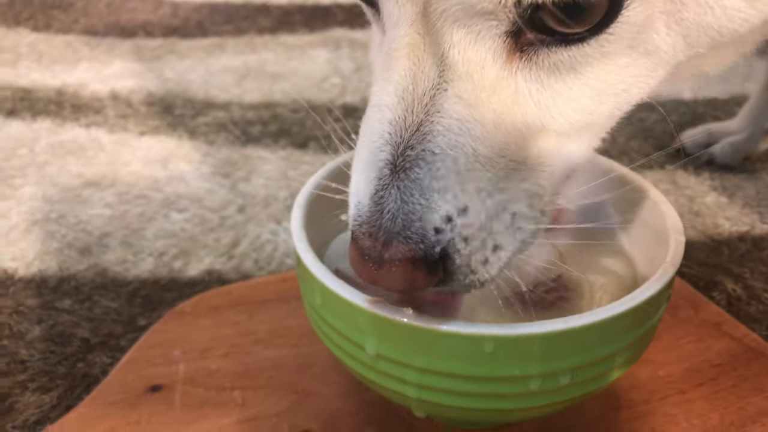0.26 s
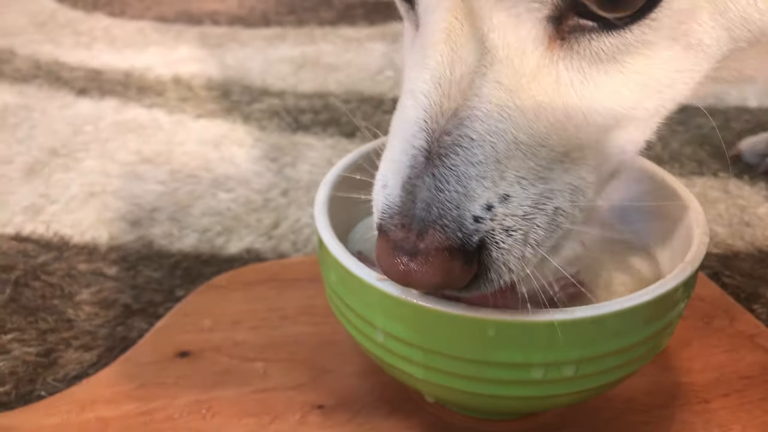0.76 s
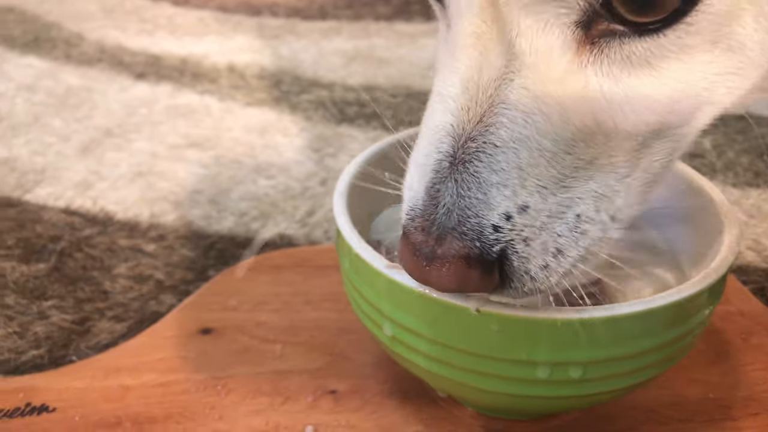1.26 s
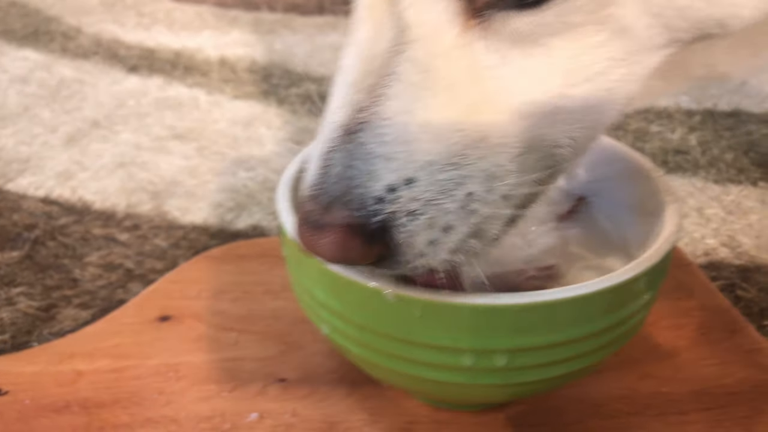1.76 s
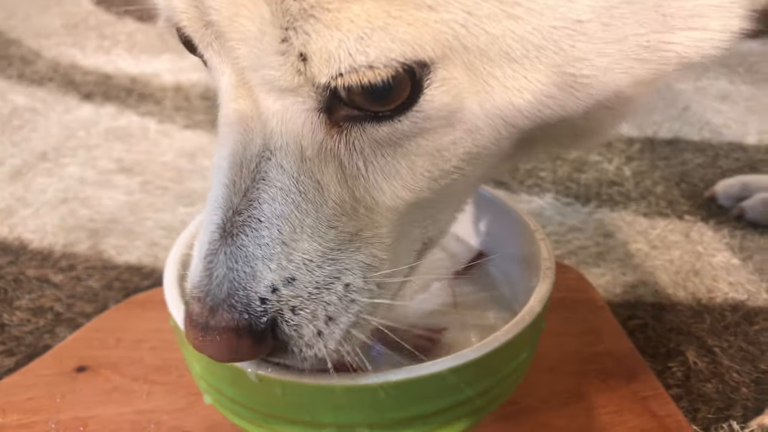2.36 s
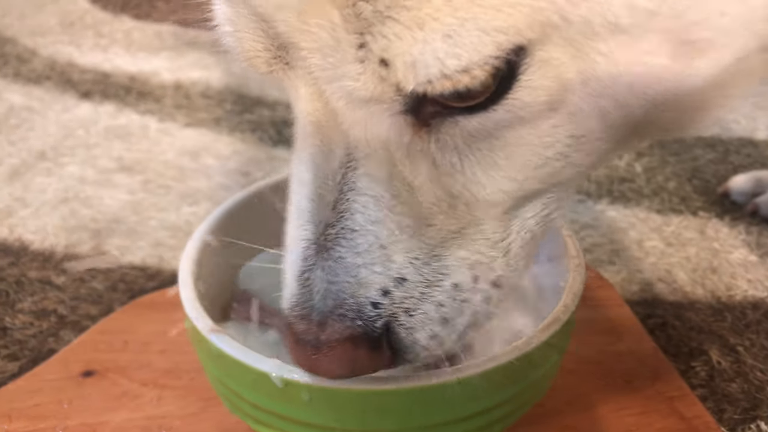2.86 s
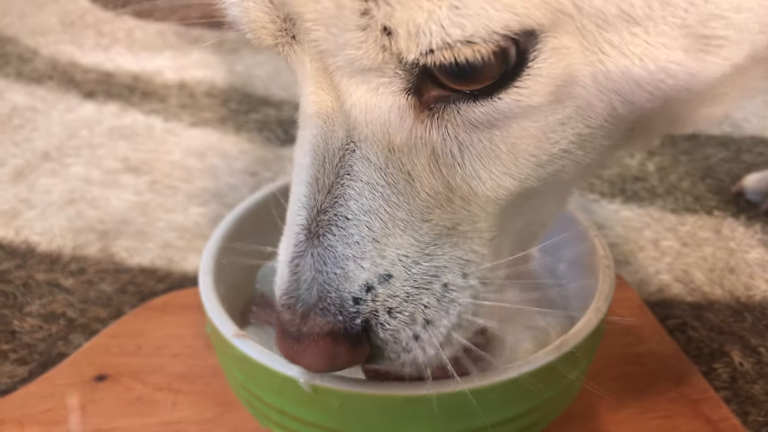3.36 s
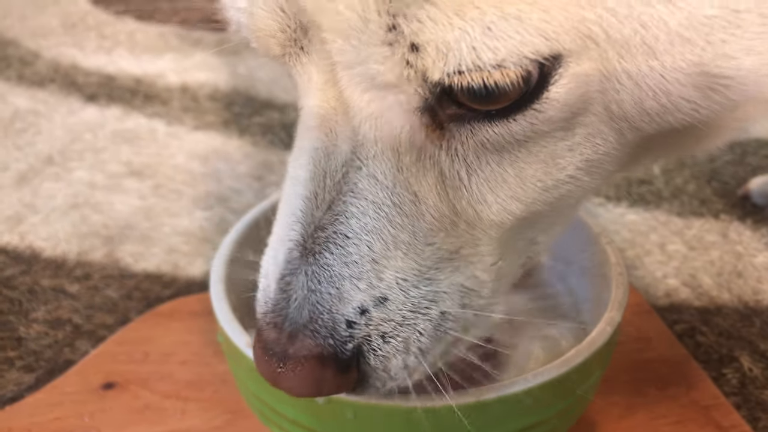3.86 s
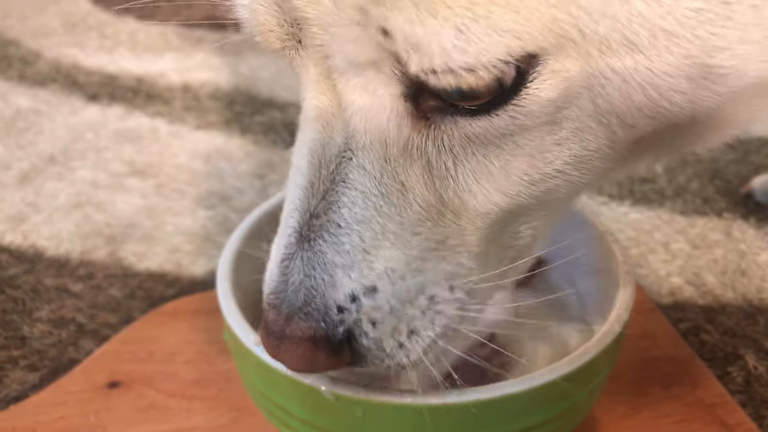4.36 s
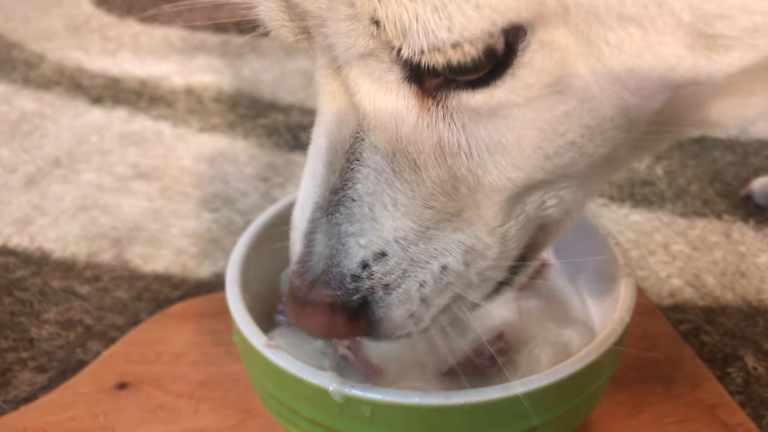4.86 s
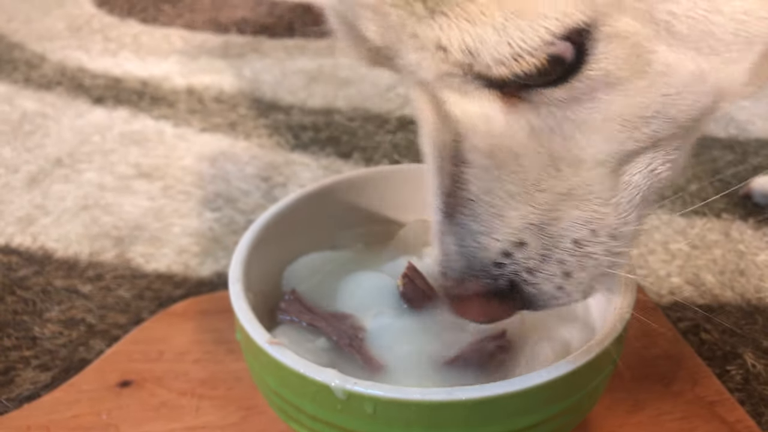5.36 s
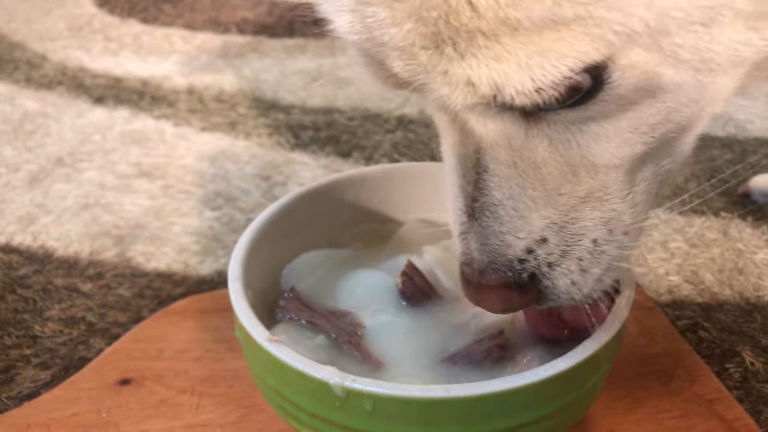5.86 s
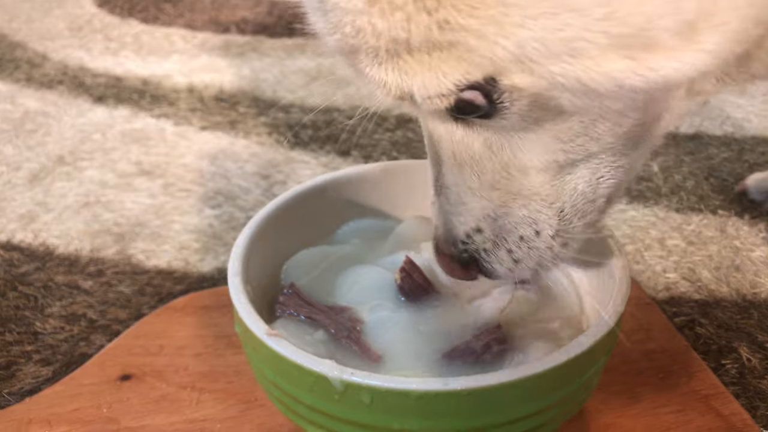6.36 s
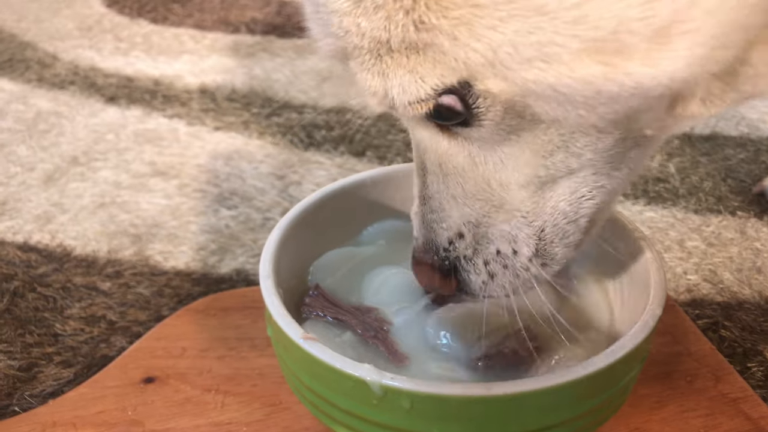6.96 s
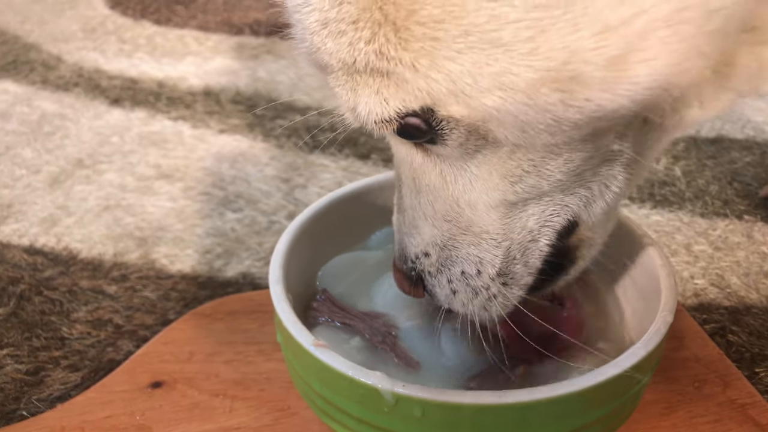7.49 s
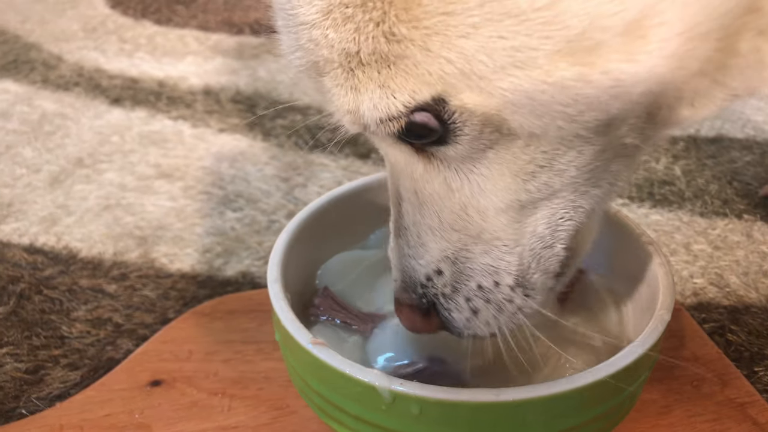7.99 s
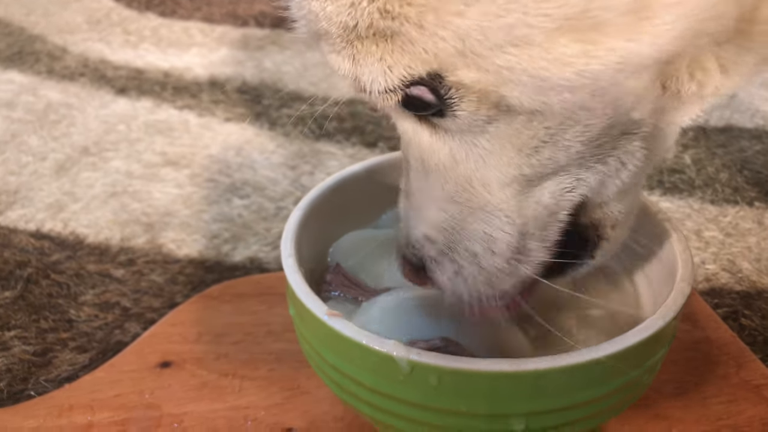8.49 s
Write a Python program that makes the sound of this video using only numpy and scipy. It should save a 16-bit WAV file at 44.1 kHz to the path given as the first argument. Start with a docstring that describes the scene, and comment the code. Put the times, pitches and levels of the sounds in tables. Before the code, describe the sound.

Steady lapping by a dog, close stereo microphone, dry furnished room with barely any echo. Each stroke goes soft lick, rounded plop, brief splatter, then a quieter wet swallow before the next. Sharper lip smacks stand out early on and again near the end. A tooth lightly rings the bowl around the middle and later, the bowl thuds softly on its board, and one tiny airy slurp slides downward late.

```python
"""A dog laps broth from a glazed bowl about three times a second, close by in a quiet carpeted room.
Each stroke is a low plop, a damped sine for the air pocket scooped under by the tongue, then a splash built
from random bubble grains. Wet smacks and thin saliva ticks are bubble tones with puffs of shaped noise. Now
and then a tooth rings the bowl's modes or the bowl bumps its board; once, a falling whistle of carried noise
is slurped. Sparse echoes and a soft noise floor give the room; two ports hear it all as left and right."""
import sys
import numpy as np
from scipy import signal
from scipy.fft import rfft, irfft, next_fast_len
from scipy.io import wavfile
from scipy.ndimage import uniform_filter1d

SR = 44100
rng = np.random.default_rng(int(sys.argv[2]) if len(sys.argv) > 2 else 0)


def generate_wav(signal):
    """Clip the signal to [-1, 1] and save it as 16-bit WAV at the path in sys.argv[1]."""
    frames = np.transpose(np.atleast_2d(signal))
    scaled = np.clip(frames, -1, 1) * 32767
    pcm = np.round(scaled).astype(np.int16)
    wavfile.write(sys.argv[1], SR, pcm)


N = 384978  # length in samples

# Tongue strokes: plunge_s, pocket_level_db, pocket_pitch_hz, pocket_fall_ms, bowl_swing_level_db,
# splash_delay_ms, then changes to the churning: lick_db, slosh_db, splash_db, swallow_db
STROKES = [(0.2259,-32,596,2,-35.5,-3,4.5,0,3,2.5),(.552,-24,573,2.7,-31,-10,-1.5,3,1,2),(0.8956,-44,510,1.2,-26.5,-13,3,0,-2,0.5),
           (1.2987,-20,560,1.15,-26.5,-7,2.5,3.5,-5.5,-5),(1.596,-38,716,3.3,-26,-11,2,1,-2,-0.5),(1.9125,-29,590,2.7,-28.5,-12,-0.5,3.5,3,3),
           (2.2409,-37,580,2.3,-29.5,-2,1.5,-1.5,-1,4),(2.5697,-29.5,570,3.1,-33.5,-6,0.5,0.5,1.5,2.5),(2.9142,-25,590,2.8,-31,-8,-1.5,3,5,2),
           (3.238,-27.5,540,3.2,-32.5,-7,2.5,-1,0,-4.5),(3.6531,-23.5,557,2.3,-26,-1.5,2,2,2,-3.5),(3.9892,-38.5,700,2.1,-26.5,3,1,1.5,2.5,-2),
           (4.3265,-25.5,512,1.7,-36,-7,3,2.5,0.5,4),(4.6565,-31,552,3.5,-34,-7,-1.5,-2,3.2,5),(4.9768,-26.5,566,2.5,-31,5,-2,-2,-0.5,-2),
           (5.3569,-21,580,2.3,-27.5,-4,2.5,-0.5,1.5,-1.5),(5.702,-22.5,640,1.9,-33,-1,1.5,-2.5,-2.5,-0.5),(6.06,-19.5,670,1.6,-33.5,-2,4,-1.5,-3,.1),
           (6.395,-19.5,673,1.7,-37.5,-5,5.5,-0.5,-1.5,4),(6.708,-19.5,597,1.6,-38.5,.1,1.5,-0.5,0.5,-2),(7.0183,-20,604,1.92,-37,7,-0.5,-0.5,-4.5,2.5),
           (7.4009,-26,587,2,-41.5,-5,-2.5,.1,-0.3,-2.5),(7.7022,-25.5,600,2,-35,-9,2.5,-1,-1,-6.5),(7.995,-22.5,600,2.1,-31,-3,-0.5,-3.5,-2,-0.5),
           (8.3018,-22,614,2.4,-33.5,16,-6,-1.5,-3.5,-1),(8.6321,-26,584,2.4,-33.5,-3,4,-2,-2,-5)]
SURFACE_DB = -51  # tick of the breaking surface
# Larger bubbles bursting: peak_s, tone_level_db, pitch_hz, fall_ms
BUBBLES = [(0.263,-31,910,1),(.3257,-32,1090,1.1),(.572,-26.5,1000,.6),(.576,-30,1000,1.6),(0.5874,-35,1070,1),
           (.6626,-29,810,1.6),(.9109,-29.5,1010,1.4),(1.0556,-32,1180,0.32),(1.3262,-28,820,0.61),(1.6202,-32,984,5.4),
           (1.7118,-34,930,0.7),(1.8225,-32.5,960,1.7),(1.9381,-31,1110,3.1),(1.9499,-36,930,2.3),(1.9967,-39.5,1400,3.7),(2.0144,-36,990,.8),(2.271,-27,1050,0.44),
           (2.2764,-35,1506,4.6),(2.311,-36,1180,1.1),(2.6068,-27,1210,.6),(2.6831,-28,980,1.05),(2.88,-31.5,830,4.9),(2.9435,-32,824,4.5),
           (3.1624,-29,1124,3.2),(3.4007,-33.5,1460,1.5),(3.4244,-26.5,1170,2.7),(3.4341,-33,1110,1.6),(3.5967,-39.5,930,1.3),
           (3.6772,-29,724,1.3),(3.681,-31.5,1500,2.7),(3.706,-29,1340,0.54),(4.018,-25,920,1.4),(4.2328,-23.5,854,3.2),
           (4.4203,-33,1000,1.3),(4.428,-29.5,855,0.6),(4.6747,-34,1020,0.73),(4.7781,-33.5,980,1.1),(5.1557,-30.5,664,1.8),
           (5.603,-43,880,2),(5.8175,-43,750,2.3),(6.0957,-28.5,1060,1.2),(6.1,-24,1230,0.45),(6.426,-33.5,1230,2.5),(6.4316,-24,970,0.64),(6.7394,-32,1310,0.68),
           (6.745,-29,930,1.4),(7.0409,-35,1240,1.2),(7.063,-37,1240,3),(7.19,-38,1380,2.2),(7.4295,-31,1190,1.9),
           (7.466,-36,1000,1),(7.511,-35.5,1130,2),(7.6706,-36.5,880,2.9),(7.7332,-30.5,1300,0.66),(8.0424,-35,760,0.7),(8.4476,-26,806,0.58),
           (8.669,-36,1300,2.6),(8.681,-35,1300,.9)]
# Wet smacks of the mouth: peak_s, tone_level_db, mouth_pitch_hz, fall_ms, spray_re_tone_db
SMACKS = [(.007,-35.5,2780,3,-1.5),(.0679,-40,2740,1.9,-2.5),(0.253,-38,3120,1.8,-2),(.264,-42,2310,1.8,5),(.2732,-31.5,2160,0.77,-3),(0.3252,-37.5,2160,1.9,5),
          (0.589,-29,2220,1.6,-2.5),(0.5962,-28.5,2230,1.2,-8),(0.659,-18,2840,2.5,-6),(0.918,-29.5,3010,2,-13),
          (0.941,-36,2130,1,4),(1.0027,-36,2810,.7,-16),(1.0472,-24.5,3100,2.6,-6),(1.0549,-13.5,2860,2.1,-9),
          (1.3257,-44,2230,0.93,8.5),(1.3512,-37,3040,2.4,-18),(1.625,-32.5,3040,2.1,2),(1.8115,-39.5,3250,0.97,-19),(1.939,-32,1850,0.65,-1.5),
          (2.0891,-36.5,3200,0.71,-0.5),(2.098,-36.5,3040,1.1,-6),(2.208,-49,2790,1.4,-2),(2.2175,-50,2500,1.2,0),(2.2695,-39,2160,3.2,7.5),(2.28,-44,2400,1.4,8),
          (2.3376,-43,2900,2.7,6.5),(2.3758,-28,2100,0.51,0.5),(2.403,-40,2820,3,-10),(2.409,-36,2780,1.3,-10),(2.4128,-30,2900,.6,-8),(2.4214,-28,3000,1.6,-10),
          (2.43,-43,2900,2,-8),(2.6068,-28.5,2380,0.87,-6),(2.683,-34.5,2700,1.3,-3),(2.9461,-24.5,2070,2.1,-1),(2.9528,-25,4400,0.83,-1.5),
          (2.9755,-32,2860,0.8,-4),(3.023,-17.5,2690,0.96,-6.5),(3.171,-41,2440,.7,-2),(3.186,-41,3900,3.9,-0.5),(3.401,-29.5,4530,4.1,0),(3.396,-44,4000,1.1,-2),(3.422,-21.5,3030,1.7,-1.5),
          (3.4642,-35.5,2110,1.3,-7),(3.6804,-29.5,4270,1.3,-2.5),(3.6905,-26.5,4500,.9,-16),(3.7068,-37.5,2840,2.1,1.5),
          (4.0177,-28,4230,0.34,2.5),(4.028,-31,4330,1.7,4.5),(4.045,-34,1570,3.1,-15),(4.218,-47,3010,2.1,-9),(4.2318,-29,3770,1.8,0.5),
          (4.3611,-36,4100,5.2,2.5),(4.4193,-33.5,2060,2.8,-4),(4.696,-27,2310,1.4,-3.5),(4.9425,-37,4350,0.4,-9),
          (4.9907,-32,4460,0.44,-2.5),(5.019,-31,2090,2.8,-2),(5.0252,-32.5,3800,1.5,-12),(5.141,-30,2000,0.65,-6),(5.1453,-20,2160,2.8,-5),
          (5.15,-22.5,1930,2,-6.5),(5.1578,-28.5,2790,4.5,-6),(5.1802,-42,2900,4.6,4),(5.376,-36,2780,2.8,-7),
          (5.3945,-28,2530,1.1,-5),(5.5976,-42,2830,0.95,-2),(5.7414,-36.5,1980,0.75,7),(5.7518,-34,1910,.9,-15),(5.92,-38.5,2930,0.56,-8),
          (5.96,-42.5,2400,.9,-1),(6.095,-28,2140,1.1,-0.5),(6.1,-26,4130,1.1,-4),(6.253,-44.5,2800,5.6,-9),(6.2722,-44,2760,.7,-12),(6.294,-44.5,2660,.8,3),(6.4275,-25.5,1820,.8,-16),(6.432,-34.5,2240,0.7,3.5),
          (6.4423,-39,2140,.5,-7),(6.538,-31,2030,0.14,2),(6.7461,-32.5,2000,0.5,-13),(6.7514,-36,2180,1.6,-7),
          (7.0643,-38,2220,1,-15),(7.077,-45,2930,1.5,3),(7.106,-43,3350,1,-1),(7.191,-47.5,2950,5.1,5),(7.432,-34.5,2220,.8,3),(7.5065,-39,3900,3.1,-11),(7.5757,-48,3100,0.68,-4),(7.7315,-33.5,4100,.5,-10),
          (8.0192,-35.5,1920,1.7,-21),(8.034,-36.5,4800,0.47,0.5),(8.127,-41.5,2000,0.93,-4),(8.179,-50,3000,0.73,-2),(8.2705,-47,2530,.7,-7),(8.337,-41,1910,.8,-4),(8.349,-37,4040,4.3,2.5),
          (8.4305,-38,2740,2,-10),(8.44,-20,2900,1.3,-7),(8.4445,-26,2800,3.4,.5),(8.679,-44,3210,1.6,-12)]
SMACK_RISE_S = 0.00077
# Saliva ticks: peak_s, tone_level_db, pitch_hz, mist_re_tone_db
TICKS = [(.0344,-37.5,8480,2),(.0652,-31.5,6260,-32),(.1492,-40.5,5700,-18),(0.1668,-43,7900,4),(.2682,-30.5,5000,-9),(.3262,-39,7000,0),
         (.353,-25,5950,-4.5),(.502,-34,5280,-24),(0.5865,-31,5000,-10),(.5936,-32,4970,-8),(0.6585,-34.5,4600,10),
         (.8303,-43,6900,0),(0.9058,-35.5,5000,-7),(1.053,-29,5800,-36),(1.2282,-41,7750,6.5),(1.531,-37.5,5860,-2.5),(1.56,-37,4960,-4),
         (1.6241,-25,4860,-18),(1.8663,-46,7900,7),(1.954,-28,4760,-31),(2.0064,-33.5,5340,-2),(2.047,-28,5870,0.5),
         (2.3737,-33,5420,0),(2.6126,-37,4880,-30),(2.961,-38,4610,-29),(3.024,-37,4500,-11),(3.1881,-39.5,7400,-1),
         (3.294,-34.5,4740,-17),(3.4015,-29,4600,1.5),(4.021,-19,4680,-18),(4.2313,-40,4500,4),(4.356,-35,4570,1),
         (4.365,-32,4500,-31),(4.371,-33,6400,-29),(4.42,-35,4570,-1),(4.6965,-32,4440,-23),(4.994,-31,4700,-11),
         (5.1426,-36,4600,3),(5.154,-30,8930,2.5),(5.2494,-44,6500,-4),(5.2764,-32.5,6600,-20),(5.328,-39.5,5930,-16),(5.4,-33.5,6460,1),
         (5.593,-35,6280,-4),(5.6683,-43.5,6660,-6),(5.7898,-40,7600,-13),(5.799,-38,6430,-1),(5.845,-40,6930,0),(6.0954,-27,4700,-33),(6.108,-37,6700,-7),(6.426,-32,4700,-29),
         (6.434,-30,4970,-22),(6.441,-34,6450,-35),(6.5372,-31.5,6670,-5),(6.719,-35,5250,-29),(6.7454,-30.5,4780,-32),
         (6.847,-33.5,6700,-1),(7.1585,-36,8230,10.5),(7.1909,-37.5,4830,1.5),(6.985,-45,6370,3),(7.2315,-42,6950,0),(7.43,-23.5,4900,-16),(7.4356,-31,6750,-24),
         (7.476,-47,6500,-8),(7.5086,-21.5,6400,-34),(7.5128,-23,5800,-16),(7.6435,-38,6150,-11),(7.7345,-31.5,4880,-24),(7.917,-42,7950,-21),(8.0313,-27,5740,-29),
         (8.4406,-24.5,7500,-10),(8.4474,-24,6640,-8),(8.5347,-36.5,7260,-7),(8.67,-35,5030,-16),(8.68,-34,6400,-25)]
# Chance pops of each stroke: from_s, to_s (both after the plunge), mean bubble_db, smack_db, tick_db
DROPLETS = [(-.1, -0.066, -54.5, -55.5, -52), (-.07, -.035, -56, -55.5, -48.5),
            (.012, 0.036, -40, -44, -41.5), (.02, 0.051, -43.5, -44, -41), (.03, .06, -41.5, -45, -45.5),
            (.09, .15, -49, -50.5, -47.5)]
DROPLET_SPREAD_DB = 10.5  # full range of the chance levels

# Relative bubble spectra, coarse to fine; each: pitch_hz, level_db
SLOSH_SPECTRUM = [(150, 3), (300, 7), (600, 5), (1200, 5), (1700, -23)]
SPLASH_SPECTRUM = [(1300, 12.5), (2100, 11.5), (2900, 9.5), (3600, 9), (4700, 11), (5500, -39)]
FIZZ_SPECTRUM = [(4000, -10), (5000, 0.5), (6500, 5), (8000, -0.5), (9500, -16)]
MIST_SPECTRUM = [(5000, -41), (7500, -3), (9500, -6), (12500, -1.5), (15500, -3.5)]
# Relative noise spectrum of the spray around a smack: frequency_hz, level_db
SPRAY_SPECTRUM = [(400, -30), (900, -12), (1600, -14), (2100, 0), (2900, 0), (3500, -9), (4600, -6),
                  (6000, -17), (9000, -32), (15500, -36)]
# Churning over one stroke (lick, hush, plunge, splash, swallow, hush), before the stroke's own changes:
# after_plunge_s, slosh_level_db, splash_level_db, fizz_level_db, mist_level_db
STROKE_SHAPE = [(-.125, -72.5, -68, -74, -77.5), (-.1, -67, -67, -64, -63), (-.04, -69, -68.5, -70, -64.5),
                (-.02, -72.5, -71.5, -75, -77), (.01, -55.5, -57.5, -67, -60),
                (.045, -49, -47.5, -55.5, -89), (.075, -55.5, -59, -65, -67), (.13, -60.5, -61, -66, -63.5),
                (.17, -67, -72, -75, -69)]
UNHEARD_PLUNGE_S = -0.063  # a plunge just before the start, whose churn still dies away
SPLASH_FROM_S, SWALLOW_FROM_S = 0.025, 0.1  # after the plunge
BURSTS_PER_S, BURST_FALL_S = 45, 0.005  # droplets land in sudden clusters that thin out

# A tooth touches the bowl; the spot decides which modes ring: start_s, lowest_mode_db, upper_modes_db
KNOCKS = [(0.349, -63, -40), (0.5, -81, -58), (1.223, -78, -53), (2.047, -68, -45), (2.374, -50.5, -47),
          (2.873, -76, -52.5), (4.371, -49, -66), (6.536, -40.5, -57)]
# Modes of the glazed wall: pitch_hz, level_re_knock_db, t60_s
BOWL_MODES = [(1291, 0, .5), (3370, -4, .14), (6067, 0, .11)]
# The bowl bumps its board: bump_s, level_db
THUDS = [(0.954, -53), (1.186, -46), (1.591, -54), (1.817, -62), (2.559, -55), (2.897, -53.5), (3.225, -59),
         (3.505, -45), (3.7, -55), (4.314, -64), (4.64, -54), (4.979, -60), (7.232, -62)]
THUD_DELAY_S = 0.0064  # from the bump to the start of the ringing
# Modes of the board: pitch_hz, level_re_thud_db, t60_s
BOARD_MODES = [(129, 8, 0.045), (330, 12.5, 0.013)]
# One slurp of air drawn past the lips: time_s, pitch_hz, level_db
SLURP_GLIDE = [(7.188, 1810, -66), (7.205, 1736, -54), (7.251, 1546, -68), (7.31, 1410, -69)]

# Phase by which the left port leads (negative: lags): frequency_hz, lead_rad
PORT_LEAD = [(100, 0.21), (2000, -0.31), (5400, -0.73), (8700, -1.02), (11000, -1.8), (13500, -1.53),
             (15500, -0.83)]
# Reverberation time: frequency_hz, t60_s
ROOM_T60 = [(200, 0.49), (600, 0.23), (2000, 0.27), (5000, 0.14), (12000, 0.047)]
# Echo strength, dulled by soft furnishings, for a tap of unit height: frequency_hz, tap_level_db
WALL_ECHO = [(200, -37), (350, -40), (600, -37), (1500, -35), (3000, -43), (7000, -46), (15000, -48)]
# Relative spectrum of the room tone: frequency_hz, level_db_per_hz
AIR_SPECTRUM = [(15, -32), (30, -10), (80, 0), (170, -6.5), (300, -0.5), (450, -15.5), (900, -13.5),
                (1700, -26), (2500, -22), (6700, -28.5), (10000, -36.5), (16000, -23)]
AIR_DB = -61.5  # RMS level of the whole room tone
# Depth of the drifting patches in the room tone: frequency_hz, depth_db
PATCH_DEPTH = [(60, 2.5), (200, 1.5), (600, -9.5), (15000, -9)]
# Likeness of the room tone at the two ports: frequency_hz, correlation
PORT_LIKENESS = [(60, 0.94), (130, 0.51), (300, 0.23), (700, 0.19), (3000, 0.18), (7000, 0.14),
                 (15000, 0.058)]
EDGE_HZ = 15900  # upper band limit


def plops():
    """Cavity resonance: the scooped pocket and the bowl's slosh swing together as the surface ticks."""
    out = np.zeros((2, N))
    for s, pocket_db, hz, fall_ms, swing_db, *_ in STROKES:
        t, pocket_shape = hump(0.0011, fall_ms / 1000)
        pocket = pocket_shape * np.sin(2 * np.pi * hz * t)
        swing = hump(0.0015, 0.003)[1] * np.sin(2 * np.pi * 340 * t)
        add(out, s + t[0], gain_of(pocket_db) * pocket + gain_of(swing_db) * swing)
        surface = pop(1870, 0.00022, 0.00094, 0, 1.7, SPRAY_SPECTRUM)
        add(out, s + t[0] - 1 / hz, gain_of(SURFACE_DB) * surface)  # one pocket period earlier
    return out


def tongue():
    """Bubble radiation: bursts, smacks and ticks are short tones; ticks differ at random between ports."""
    out, lead = np.zeros((2, N)), 256 / SR  # a pop peaks 256 samples in
    bubbles, smacks, ticks = droplets()
    for s, db, hz, fall_ms in BUBBLES + bubbles:
        bubble = pop(hz, 0.0005, fall_ms / 1000, 0.0034, -14.0, SLOSH_SPECTRUM)
        add(out, s - lead, gain_of(db) * bubble)
    for s, db, hz, fall_ms, spray_db in SMACKS + smacks:
        smack = pop(hz, SMACK_RISE_S, fall_ms / 1000, 0.004, spray_db, SPRAY_SPECTRUM)
        add(out, s - lead, gain_of(db) * smack)
    for s, db, hz, mist_db in TICKS + ticks:
        tick = gain_of(db) * pop(hz, 0.0001, 0.0013, 0.0089, mist_db, MIST_SPECTRUM)
        add(out, s - lead, tick)
        # a late copy of random sign and size makes the right port differ
        add(out[1:], s - lead + 1 / SR, rng.uniform(-0.48, 0.61) * tick)
    return out


def droplets():
    """Chance events: one small bubble, smack and tick fall at random in each busy phase of a stroke."""
    bubbles, smacks, ticks = [], [], []
    for plunge, *_ in STROKES:
        for start, end, bubble_db, smack_db, tick_db in DROPLETS:
            when, size, pitch, wet = rng.random((4, 3))
            s = plunge + start + (end - start) * when
            db = DROPLET_SPREAD_DB * (size - 0.5)
            bubbles.append((s[0], bubble_db + db[0], 800 + 700 * pitch[0], 0.69 + 0.57 * wet[0]))
            smacks.append((s[1], smack_db + db[1], 1900 + 2200 * pitch[1] ** 2, 1.1, 4 - 12 * wet[1]))
            ticks.append((s[2], tick_db + db[2], 4700 + 2800 * pitch[2], -2 - 26 * wet[2]))
    return bubbles, smacks, ticks


def pop(hz, rise, fall, glide, spray_db, spectrum):
    """Bubble resonance: the tone rises by its glide as the pocket shrinks, wrapped in a puff of spray."""
    t, shape = hump(rise, fall)
    tone = np.cos(2 * np.pi * hz * t * (1 + glide * np.clip(t / fall, -2, 4)))
    spray = evened(echoed(coloured(rng.standard_normal(len(t)), spectrum)))
    return shape * (tone + gain_of(spray_db) * spray)


def hump(rise, fall):
    """Growth and decay about a peak 256 samples in; rise and fall are the seconds for a 6 dB change."""
    t = (np.arange(2048) - 256) / SR
    rising_db = -6 * (t / max(rise, 1e-4)) ** 2
    falling_db = -6 * (np.maximum(t, 0) / max(fall, 2e-4)) ** 1.25
    return t, gain_of(np.where(t < 0, rising_db, falling_db))


def broth():
    """Bubble ensembles: four size ranges follow the churning and burst in shared clumps of some 20 ms."""
    slosh_db, splash_db, fizz_db, mist_db = churning() + [[0.5], [1.5], [2.5], [2.5]] * bursts()
    noise = rng.standard_normal(N)
    clumps = evened(uniform_filter1d(uniform_filter1d(noise, size=700), size=200))
    out = gain_of(slosh_db + 2 * clumps) * grains(SLOSH_SPECTRUM, 1200, cycles=5.0, spread_db=4.0)
    out += gain_of(splash_db + 2 * clumps) * grains(SPLASH_SPECTRUM, 2600, cycles=9.0, spread_db=3)
    out += gain_of(fizz_db + 4 * clumps) * grains(FIZZ_SPECTRUM, 5000, cycles=7, spread_db=2.5)
    middle, side = [grains(MIST_SPECTRUM, 9000, cycles=3.0, spread_db=6.0, count=8) for _ in range(2)]
    mist = 0.59 * middle + [[0.5], [-0.5]] * side  # the side part is opposite at the two ports
    return out + gain_of(mist_db + 4.6 * clumps) * mist


def churning():
    """Periodic forcing: every stroke repeats one shape of four levels, each phase with its own force."""
    offset, shape = np.array(STROKE_SHAPE)[:, 0], np.array(STROKE_SHAPE)[:, 1:]
    splashing = (offset > SPLASH_FROM_S) & (offset < SWALLOW_FROM_S)
    phase = offset[:, None]
    s, levels = [UNHEARD_PLUNGE_S + offset], [shape]
    for plunge, *_, late_ms, lick_db, slosh_db, splash_db, swallow_db in STROKES:
        s.append(plunge + offset + splashing * late_ms / 1000)
        plunge_db = [slosh_db, splash_db, splash_db, splash_db / 2]  # slosh, splash, fizz, mist
        force_db = np.where(phase < 0, lick_db, plunge_db)
        levels.append(shape + np.where(phase > SWALLOW_FROM_S, swallow_db, force_db))
    s, levels = np.concatenate(s), np.concatenate(levels)
    order = np.argsort(s)
    return [np.interp(np.arange(N) / SR, s[order], c) for c in levels[order].T]


def bursts():
    """Shot noise: a level jumps at chance moments and sinks back exponentially."""
    jumps = rng.exponential(1, N) * (rng.random(N) < BURSTS_PER_S / SR)
    level = signal.lfilter([1], [1, -np.exp(-1 / (BURST_FALL_S * SR))], jumps)
    return evened(np.minimum(level, 3) - level.mean())


def grains(spectrum, per_s, cycles, spread_db, count=16):
    """Random superposition: tiny bubbles of many sizes burst by chance, a few louder, at unit RMS."""
    out, t = np.zeros(N), np.arange(1024) / SR
    for hz in np.geomspace(spectrum[0][0], spectrum[-1][0], count):
        strikes, at = np.zeros(N), rng.integers(0, N, round(per_s / count * N / SR))
        strikes[at] = gain_of(spread_db * np.minimum(rng.exponential(1, len(at)), 4))
        u = t * hz / cycles
        rising_phase = 2 * np.pi * hz * t * (1 + 0.041 * np.minimum(u, 2))
        grain = u * np.exp(-3 * u) * np.sin(rising_phase)
        weight = gain_of(read(spectrum, hz)) * hz / 1000
        out += weight * signal.oaconvolve(strikes, grain)[:N]
    return evened(echoed(out, share=0.043))


def echoed(x, share=0.079):
    """Comb filtering: the bowl wall returns the sound inverted 25 samples later, dips 1.76 kHz apart."""
    return signal.lfilter(np.r_[1, np.zeros(24), -share], 1, x)


def bowl():
    """Modal vibration: the glazed wall rings after a tooth's touch; the board thuds as the bowl rocks."""
    out = np.zeros((2, N))
    for s, low_db, upper_db in KNOCKS:
        lowest = gain_of(low_db) * modes(BOWL_MODES[:1], turns=0.25)
        upper = gain_of(upper_db) * modes(BOWL_MODES[1:], turns=0.41)
        add(out, s, lowest + upper)
    for s, db in THUDS:
        add(out, s + THUD_DELAY_S, gain_of(db) * modes(BOARD_MODES, turns=0.25))
    return out


def modes(table, turns):
    """Modal superposition: damped sines struck together, each swelling over a number of turns."""
    t = np.arange(SR // 2) / SR
    out = np.zeros(len(t))
    for hz, db, t60 in table:
        swell = (1 - np.exp(-t * hz / turns)) ** 2
        out += gain_of(db - 60 * t / t60) * swell * np.sin(2 * np.pi * hz * t)
    return out


def slurp():
    """Modulated noise: slow noise carried on a pitch that falls as the lips close makes a fuzzy whistle."""
    s, hz, db = np.transpose(SLURP_GLIDE)
    t, out = np.arange(s[0], s[-1], 1 / SR), np.zeros((2, N))
    a, b = uniform_filter1d(rng.standard_normal((2, len(t))), size=250)
    carrier = np.exp(2j * np.pi * np.cumsum(np.interp(t, s, hz)) / SR)
    whistle = evened((carrier * (a + 1j * b)).real)
    add(out, s[0], gain_of(np.interp(t, s, db)) * whistle)
    return out


def room(x):
    """Reverberation: sparse taps of random sign, each band dying at its own speed, partly shared by ports."""
    taps = np.zeros((3, SR // 2))  # left, right, shared
    slots = np.arange(500, SR // 2 - 20, 20)  # one tap in every 20 samples
    at = slots + rng.integers(0, 20, (3, (SR // 2 - 501) // 20))
    np.put_along_axis(taps, at, rng.choice([-1., 1.], at.shape), 1)
    hz, t, z = signal.stft(taps[:2] + 4.1 * taps[2], SR, nperseg=256)
    z *= gain_of(-60 * t / read(ROOM_T60, hz)[:, None] + read(WALL_ECHO, hz)[:, None])
    tail = signal.istft(z, SR, nperseg=256)[1]
    return signal.fftconvolve(x[None], tail, axes=1)[:, :N]


def room_tone():
    """Partial coherence: air noise with faint drifting patches, partly alike at both ports."""
    frames, hz = N // 256 + 5, np.fft.rfftfreq(1024, 1 / SR)
    a, b, c, d, patches = rng.standard_normal((frames, 513, 5)).T
    # smoothed over frequency, then over time
    patches = evened(uniform_filter1d(uniform_filter1d(patches, 12, 0), 14, 1))
    same = np.clip(read(PORT_LIKENESS, hz), -1, 1)[:, None]
    left = a + 1j * b
    right = same * left + np.sqrt(1 - same ** 2) * (c + 1j * d)
    z = np.array([left, right])
    z *= gain_of(read(AIR_SPECTRUM, hz)[:, None] + read(PATCH_DEPTH, hz)[:, None] * patches)
    return gain_of(AIR_DB) * evened(signal.istft(z, nperseg=1024, noverlap=768)[1][:, :N])


def gain_of(db):
    """Decibel law: amplitude ratio of a level."""
    return 10 ** (np.asarray(db) / 20)


def evened(x):
    """Normalisation: scales a signal to unit RMS."""
    return x / np.sqrt(np.mean(x ** 2) + 1e-20)


def read(points, hz):
    """Interpolation: reads a (frequency, value) curve along a logarithmic frequency axis."""
    f, value = np.transpose(points)
    return np.interp(np.log(hz + 1), np.log(f + 1), value)


def coloured(x, spectrum):
    """Linear filtering: shapes each row by a spectrum of frequency_hz, level_db."""
    size = x.shape[-1]
    return irfft(rfft(x) * gain_of(read(spectrum, np.fft.rfftfreq(size, 1 / SR))), size)


def add(mix, s, sound):
    """Superposition: adds a sound to every row from a time in seconds, cut off at the end."""
    part = mix[:, round(s * SR):][:, :len(sound)]
    part += sound[:part.shape[1]]


def scene():
    """Superposition: direct sound with the ports' phase difference, then room echoes and room tone."""
    # a zero-phase high-pass thins the wet sounds below 150 Hz
    high_pass = signal.butter(2, 150, "high", fs=SR, output="sos")
    wet = signal.sosfiltfilt(high_pass, plops() + tongue() + broth())
    near = wet + bowl() + slurp()
    size = next_fast_len(N)
    half_lead = read(PORT_LEAD, np.fft.rfftfreq(size, 1 / SR)) / 2
    turned = rfft(near, size) * np.exp(1j * np.outer([1, -1], half_lead))
    direct = irfft(turned, size)[:, :N]
    return gain_of([[-0.1], [0.1]]) * direct + room(near.mean(0)) + room_tone()


def record(dry):
    """Band limitation: a linear-phase low-pass removes the sound above the edge."""
    low_pass = signal.firwin(511, EDGE_HZ, window=("kaiser", 9), fs=SR)
    return signal.oaconvolve(dry, low_pass[None], "same")


dry = scene()
out = record(dry)
generate_wav(out)
```